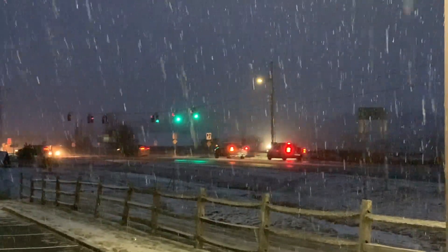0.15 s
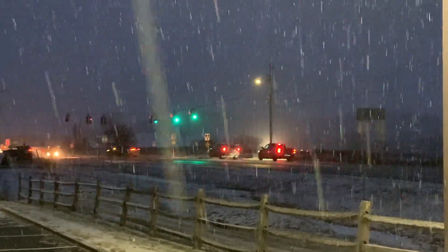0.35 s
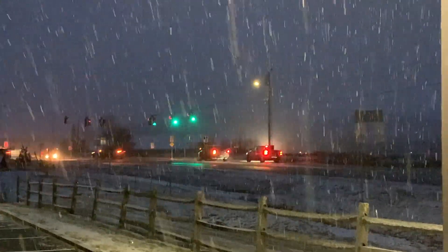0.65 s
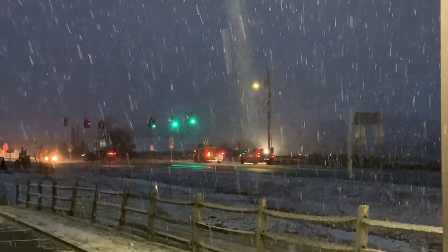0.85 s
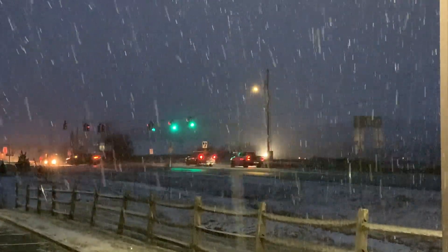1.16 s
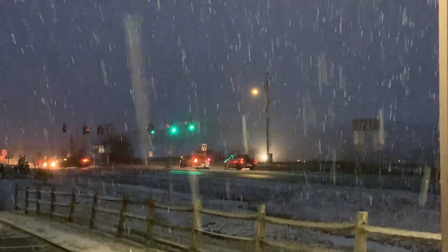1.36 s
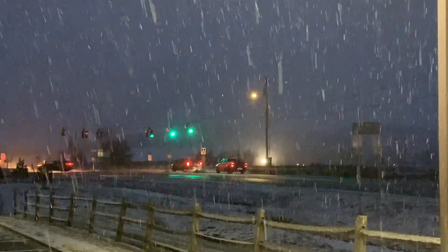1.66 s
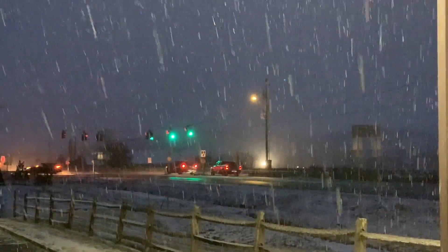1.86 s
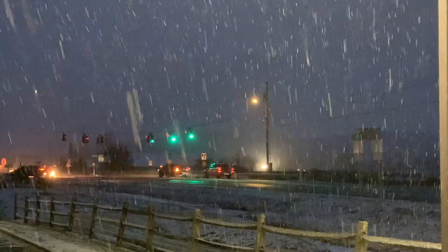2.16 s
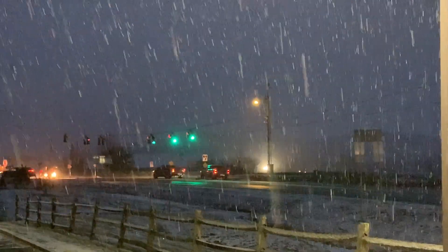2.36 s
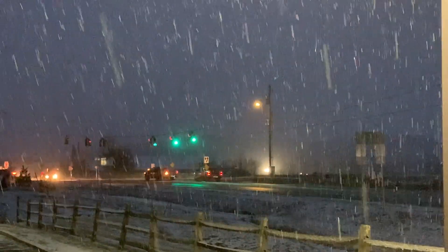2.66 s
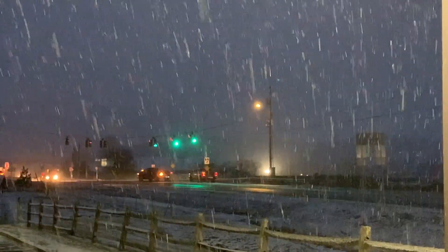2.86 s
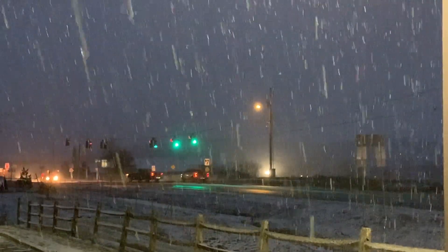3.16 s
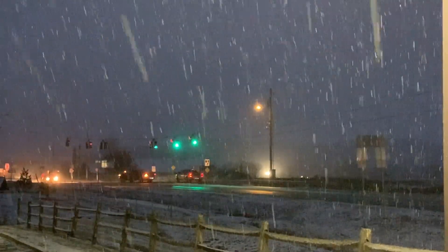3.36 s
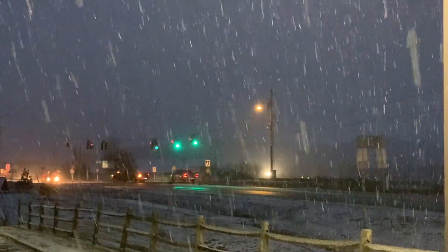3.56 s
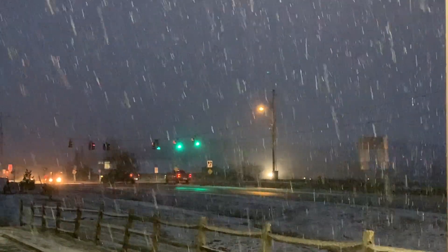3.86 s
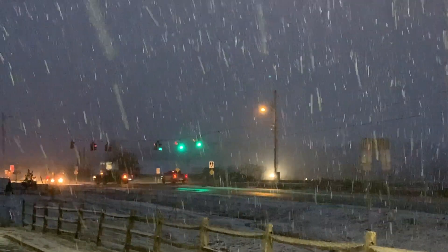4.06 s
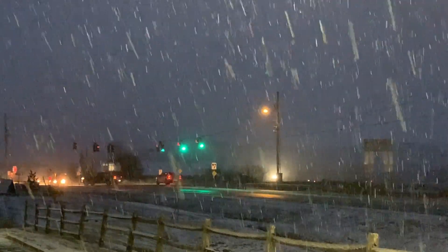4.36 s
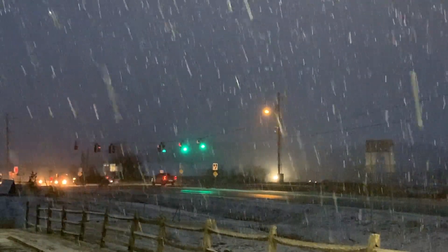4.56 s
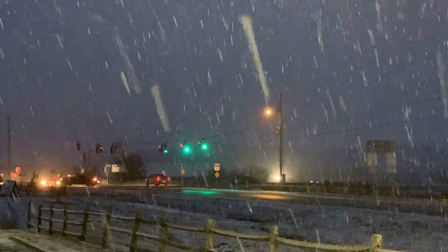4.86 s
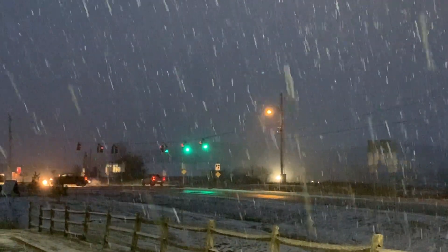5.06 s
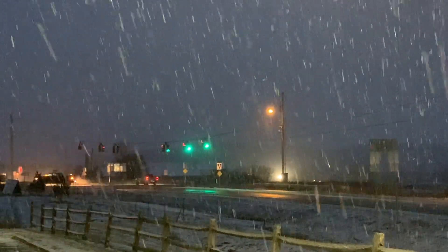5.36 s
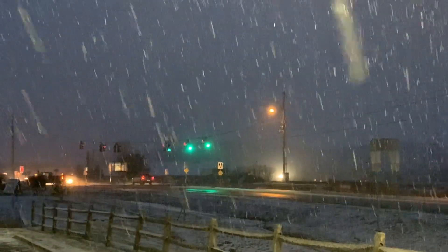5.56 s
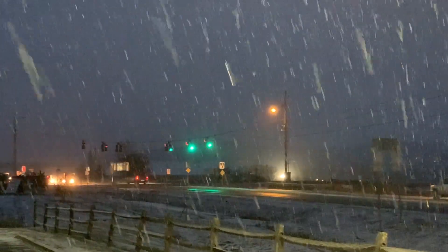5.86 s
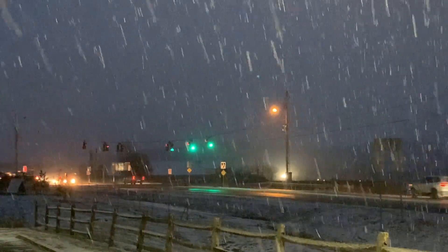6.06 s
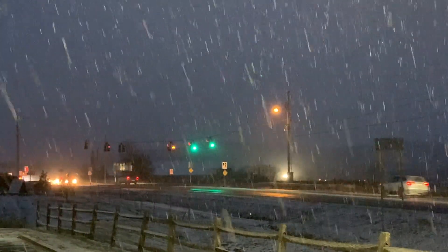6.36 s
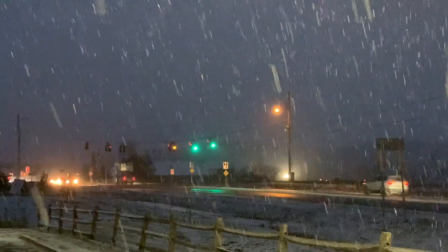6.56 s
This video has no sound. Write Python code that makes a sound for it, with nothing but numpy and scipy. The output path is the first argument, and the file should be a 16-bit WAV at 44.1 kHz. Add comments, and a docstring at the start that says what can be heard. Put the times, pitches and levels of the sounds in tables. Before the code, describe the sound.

Continuous traffic on wet, slushy pavement, slightly right of centre. Overlapping tyre roars swell and recede with soft bursts of bright slush hiss, hollow hum and fine sizzling mist. Underneath, a muffled engine pulls up through gears, brief low booms sag in pitch, a distant idle holds and a V8 throbs nearer. The stereo microphones stand back from the roadside in open air.

```python
"""Tyres roar and hiss on a wet, slushy road, heard from across a verge with a closely spaced microphone pair.
The cars are coloured noises with a moving ground reflection; slush, tread hum and fine mist are noise bands.
A V8 rumbles in from the right as sines on multiples of its cycle rate, over bands of gassy noise.
Behind it another engine pulls up through its gears as a sine with a faint octave, low booms well up,
a far engine idles on one low sine, and a wide wash of traffic noise lies underneath."""
import sys
import numpy as np
from scipy import signal
from scipy.fft import rfft, irfft, next_fast_len
from scipy.io import wavfile
from scipy.ndimage import uniform_filter1d, map_coordinates

SR = 44100
rng = np.random.default_rng(int(sys.argv[2]) if len(sys.argv) > 2 else 0)


def bounce(signal):
    """Save signal as a 16-bit WAV file at the path given by the first command-line argument."""
    frames = np.transpose(np.atleast_2d(signal))
    limited = np.clip(frames, -1, 1)
    pcm = np.round(limited * 32767).astype(np.int16)
    wavfile.write(sys.argv[1], SR, pcm)


N = 295911
TIME = np.arange(N) / SR


def from_db(db):
    """Decibels to gain."""
    return 10 ** (np.asarray(db) / 20)


def rms_one(x):
    """Scale to unit power."""
    return x / np.sqrt(np.mean(x ** 2) + 1e-20)


def in_time(rows):
    """Draw each column of a table as a curve over every sample."""
    seconds, *columns = np.transpose(rows)
    return [np.interp(TIME, seconds, column) for column in columns]


def drift(rate):
    """Slow chance with spread 1: noise through two equal low-pass poles at rate Hz."""
    step = 40  # samples between the slow values
    pole = np.exp(-2 * np.pi * rate * step / SR)
    chance = rng.standard_normal(N // step + 2002)
    slow = signal.lfilter([1], [1, -2 * pole, pole * pole], chance)[2000:]  # skip the filter's start
    return np.interp(np.arange(N) / step, np.arange(len(slow)), rms_one(slow))


def colour(x, points):
    """Equalise by a table of (Hz, dB), drawn over log frequency."""
    size = next_fast_len(N + SR // 4)
    hz, db = np.transpose(points)
    log_hz = np.log(np.maximum(np.arange(size // 2 + 1) * SR / size, 1))
    gain = from_db(np.interp(log_hz, np.log(hz), db))
    return irfft(rfft(x, size) * gain, size)[..., :N]


def noise(points, channels=1):
    """Unrelated noises of the given colour at unit power, dying away an octave beyond both ends."""
    closed = [(points[0][0] / 2, -100), *points, (points[-1][0] * 2, -100)]
    return rms_one(colour(rng.standard_normal((channels, N)), closed))


def tone(hz, level_db):
    """A sine on a moving pitch at a given rms level."""
    cycles = np.cumsum(hz) / SR + rng.random()
    return np.sqrt(2) * from_db(level_db) * np.sin(2 * np.pi * cycles)


def delayed(x, lag_ms):
    """The sound a moment later, by a delay that may move."""
    return map_coordinates(x, [np.arange(N) - lag_ms * SR / 1000], order=2, mode="nearest")


def from_right(x, lag_ms):
    """Sound from the right reaches the left microphone later."""
    return np.array([delayed(x, lag_ms), x])


def two_mics(direct, separate, lag_ms, scattered):
    """Mix sound from one direction with a share of power that is scattered to each microphone separately."""
    share = np.clip(scattered, 0, 1)
    return np.sqrt(1 - share) * from_right(direct, lag_ms) + np.sqrt(share) * separate


def spread(points, lag_ms, scattered):
    """Coloured noise from the right, partly scattered by the surroundings."""
    draws = noise(points, channels=3)
    return two_mics(draws[0], draws[1:], lag_ms, scattered)


SWELL_ATTACK_S, SWELL_RELEASE_S = 0.026, 0.057


def swell(start, length):
    """A level curve that rises to 1, holds and falls away."""
    rise = (TIME - start) / SWELL_ATTACK_S
    fall = 1 - (TIME - start - length) / SWELL_RELEASE_S
    return np.clip(np.minimum(rise, fall), 0, 1)


# Tyre tracks of two cars leaving, of traffic far up the road on the right, and of the arriving V8.
# Each row: time in seconds, tyre roar in dB, spray in dB (both before patchiness and pan),
# lag of the left microphone in ms, delay of the ground reflection in ms.
FIRST_CAR_TRACK = [(0, -46.5, -45, 0.38, 0.37), (.6, -42.5, -45, 0.42, 0.4), (1.3, -44, -49, 0.44, 0.497),
                   (1.8, -45.5, -45, 0.48, 0.601), (2.6, -56, -48.5, 0.441, 0.75),
                   (4, -76, -74, 0.53, 0.92)]
SECOND_CAR_TRACK = [(0, -60, -51.5, 0.4, 0.3), (1.1, -43.5, -48, 0.42, 0.32),
                    (2.3, -40.5, -43.5, 0.43, 0.384), (3.05, -37, -43, 0.416, 0.435),
                    (3.7, -42.5, -42.5, 0.47, 0.522), (4.4, -46, -45.5, 0.45, 0.654),
                    (5, -43.5, -51.5, 0.38, 0.78), (6.7, -41, -63, 0.49, 0.74)]
FAR_RIGHT_TRACK = [(0, -46.5, -65, 0.71, 0.35), (1.3, -49.5, -57, 0.45, 0.54),
                   (2.6, -43.5, -61, 0.51, 0.46), (3.2, -43, -53.5, 0.52, 0.47),
                   (4, -40.5, -41.5, .5, 0.495), (4.45, -47, -40.5, 0.54, 0.58),
                   (4.95, -44.5, -47, 0.51, 0.57), (5.4, -50, -54, 0.44, 0.66), (6.7, -54, -53, 0.43, 0.69)]
ARRIVING_TRACK = [(0, -47.5, -83, 0.18, 0.9), (3, -59.5, -45, 0.44, 1.02), (3.7, -50, -44.5, 0.34, 0.96),
                  (4.4, -42, -48.5, 0.44, 1.13), (4.95, -43, -43, 0.41, 0.87),
                  (5.25, -41, -42.5, 0.35, .78), (5.7, -36, -40, 0.31, 0.64),
                  (6.05, -37.5, -41, 0.25, 0.69), (6.35, -36, -39, 0.23, 0.58),
                  (6.7, -38, -42.5, 0.18, 0.47)]
# Tyre colours for the leaving cars, the far right and the V8.
# Each row: frequency in Hz, relative density in dB per Hz.
DISTANT_ROAR_COLOUR = [(100, 2), (300, -2), (500, -9), (720, -22), (1000, -1), (1400, 1.5), (1900, -16.5),
                       (2800, -12), (5000, -48)]
DISTANT_SPRAY_COLOUR = [(800, 4), (1700, 5), (2500, -2.5), (3400, -1), (4300, 1), (5200, -6), (6500, -13.5),
                        (7700, -16), (8200, -7), (9500, -19.5), (12000, -70)]
SIDE_ROAR_COLOUR = [(100, -26), (300, -13), (520, -2.5), (740, -0.5), (880, 1.5), (1200, -0.5), (1800, -3),
                    (2800, -35), (5000, -53)]
SIDE_SPRAY_COLOUR = [(800, 9), (1700, -6), (2600, -1), (3500, 3), (4200, 3), (5200, -28), (6500, -20),
                     (7700, -22), (8200, -13), (9500, -15), (13000, -72)]
CLOSE_ROAR_COLOUR = [(100, -21), (300, -8), (390, -6), (490, -7), (620, -2), (740, 1.5), (950, -3.5),
                     (1150, -7.5), (1400, -4.5), (1800, -9), (2800, -20.5), (5000, -36)]
CLOSE_SPRAY_COLOUR = [(800, -0.5), (1700, -4), (2600, 1.5), (3500, -0.5), (4400, -3), (5400, -17),
                      (6800, -26), (8200, -43), (9500, -17), (13000, -62)]
ROAD_REFLECTS = .4  # ground reflection off the wet road, as a share of the direct amplitude


def tyres(track, roar_colour, spray_colour, scattered, reflected, patchy_db, pan_db):
    """The tread roars and flings slush; an inverted ground reflection sweeps notches through both."""
    roar_db, spray_db, lag_ms, reflection_ms = in_time(track)
    roar = from_db(roar_db + patchy_db * drift(18.0)) * noise(roar_colour, channels=3)
    spray = from_db(spray_db + patchy_db * drift(21.0)) * noise(spray_colour, channels=3)
    draws = roar + spray
    direct = draws[0] - reflected * delayed(draws[0], reflection_ms)
    direct = direct / np.hypot(1, reflected)  # keep the power despite the reflection
    both = two_mics(direct, draws[1:], lag_ms, scattered)
    return both * from_db([[pan_db / 2], [-pan_db / 2]])


def road_traffic():
    """Four streams of tyre noise: two cars leaving, far traffic on the right and the arriving V8."""
    road = tyres(FIRST_CAR_TRACK, DISTANT_ROAR_COLOUR, DISTANT_SPRAY_COLOUR, scattered=0.11,
                 reflected=ROAD_REFLECTS, patchy_db=0.5, pan_db=-0.2)
    road += tyres(SECOND_CAR_TRACK, DISTANT_ROAR_COLOUR, DISTANT_SPRAY_COLOUR, scattered=0.059,
                  reflected=ROAD_REFLECTS, patchy_db=1.06, pan_db=-1.0)
    road += tyres(FAR_RIGHT_TRACK, SIDE_ROAR_COLOUR, SIDE_SPRAY_COLOUR, scattered=0.093,
                  reflected=ROAD_REFLECTS, patchy_db=0.36, pan_db=1.5)
    road += tyres(ARRIVING_TRACK, CLOSE_ROAR_COLOUR, CLOSE_SPRAY_COLOUR, scattered=0.098,
                  reflected=0.032, patchy_db=1.0, pan_db=-1.5)
    return road


# Patches of deeper slush under the tyres. Each row: peak time in seconds, time in seconds from the peak
# to 1/e of its amplitude, peak level in dB before flutter, lag of the left microphone in ms.
SLUSH_SWELLS = [(1.048, 0.19, -58, 0.46), (2.1, .22, -58, .45), (3.3, 0.19, -55, .4),
                (3.723, 0.43, -53, .3), (5.405, 0.74, -55, 0.3)]
# Bright slush hiss. Each row: frequency in Hz, relative density in dB per Hz.
SLUSH_HISS_COLOUR = [(3800, -20), (4900, 5), (5500, 1), (6600, -2), (7400, -5), (8300, -3), (10000, -13)]


def slush(flutter_db):
    """Each patch of deeper slush throws up a swell of bright hiss."""
    hiss = 0
    for peak, half_length, db, lag_ms in SLUSH_SWELLS:
        bell = np.exp(-((TIME - peak) / half_length) ** 2)
        hiss += from_db(db) * bell * spread(SLUSH_HISS_COLOUR, lag_ms, scattered=0.3)
    return hiss * from_db(flutter_db * drift(20))


# Tread hum. Each row: time in seconds, level in dB before flutter, lag of the left microphone in ms.
TREAD_HUM_TRACK = [(0, -66, 0.44), (2.6, -54.5, .45), (2.95, -48, 0.71), (3.3, -52, 0.48),
                   (3.95, -45.5, 0.44), (4.5, -52, 0.47), (5.4, -50, .36), (5.85, -44.5, 0.24),
                   (6.7, -48.5, .2)]
# Narrow band of the hum. Each row: frequency in Hz, relative density in dB per Hz.
TREAD_HUM_COLOUR = [(580, -23), (720, 1.5), (800, 6), (930, -8), (1150, -23)]


def tread(flutter_db):
    """Air pumped from the tread grooves gives an unsteady, hollow hum."""
    level_db, lag_ms = in_time(TREAD_HUM_TRACK)
    hum = spread(TREAD_HUM_COLOUR, lag_ms, scattered=0.042)
    return from_db(level_db + flutter_db * drift(21)) * hum


# Fine droplets that only carry from nearby. Each row: time in seconds, level in dB before gain and flutter.
MIST_LEVEL = [(0.15, -80), (1.48, -75), (2.18, -65), (2.48, -68), (2.99, -62), (3.9, -63.5), (4.45, -64),
              (5.26, -57), (6.15, -61), (6.68, -66.5)]
# Colours of the sizzle and of its very top. Each row: frequency in Hz, relative density in dB per Hz.
MIST_SIZZLE_COLOUR = [(4000, -3), (7000, 2.5), (8300, 3), (9500, 1.5), (11000, 0), (12000, -31)]
MIST_TOP_COLOUR = [(11800, -47), (12600, 8.5), (13400, 0), (14200, -5), (15000, -21)]


def mist(gain_db, flutter_db, top_db, top_follows):
    """The finest spray sizzles at the top of the range; the very top fades fastest with distance."""
    level_db, = in_time(MIST_LEVEL)
    flutter = from_db(flutter_db * drift(25))
    sizzle = from_db(level_db + gain_db) * spread(MIST_SIZZLE_COLOUR, lag_ms=0.4825, scattered=0.15)
    top_level_db = top_db + top_follows * (level_db - level_db.max())
    top = from_db(top_level_db) * spread(MIST_TOP_COLOUR, lag_ms=0.435, scattered=0.1)
    return flutter * (sizzle + top)


# V8 engine speed. Each row: time in seconds, four-stroke cycles per second in Hz before a slight waver.
V8_CYCLE_RATE = [(0, 10.44), (.65, 10.18), (1.7, 10.41), (2.4, 10.65), (3.5, 10.76), (4.1, 10.96),
                 (4.6, 10.85), (5.1, 10.89), (6.7, 10.66)]
# How strong the low exhaust drone is, and how near the engine. Each row: time in seconds, level in dB
# (only its distance from the full level below counts).
V8_DRONE_LEVEL = [(0, -42.5), (.35, -35.5), (.8, -31.5), (1.05, -42), (1.35, -30.5), (1.58, -31.5),
                  (1.7, -33.5), (1.84, -26), (2.05, -36), (2.26, -25), (2.52, -29.5), (2.75, -26),
                  (3.5, -22.5), (4.05, -26.5), (4.3, -25.5), (5.45, -26.5), (6.15, -39), (6.38, -27.5),
                  (6.7, -49)]
V8_NEARNESS = [(0, -66), (1.1, -58), (1.6, -45), (2.5, -44), (4, -36), (5.4, -33), (6.2, -37.5), (6.7, -47)]
FULL_DRONE_DB, FULL_NEAR_DB = -23.5, -34  # here the orders have their listed strength
# Exhaust orders. Each row: multiple of the cycle rate, level in dB at full drone and nearness.
V8_EXHAUST_ORDERS = [(4, -41.5), (5, -29), (7, -39), (8, -29.5), (9, -45), (10, -40.5), (11, -34),
                     (12, -50.5), (13, -24), (14, -41.5), (15, -47), (16, -30), (17, -40), (18, -37.5),
                     (20, -36.5), (21, -37), (22, -42), (24, -50), (25, -47), (26, -47), (28, -50.5),
                     (29, -44), (30, -50), (31, -52.5), (33, -51), (37, -52)]
# How the orders follow the engine, read between rows. Each row: multiple of the cycle rate,
# dB per dB of drone, dB per dB of nearness.
V8_ORDERS_FOLLOW = [(5, 0.8, 0.34), (7.88, 0.38, 0.1), (9, -0.5, 0.1), (10, 0, 0), (11.4, 0.2, 0.16),
                    (13.03, 1.0, -0.05), (16.7, 0.1, 0.59), (18.8, -0.4, 3.9), (19.4, -0.3, 2.24),
                    (24.3, 0.5, 0.3), (28, -1, 1.7), (30.6, 0.5, 0.5)]
# Single exhaust notes swell or sink. Each row: start in seconds, length in seconds,
# multiple of the cycle rate, gain in dB.
V8_ORDER_SWELLS = [(1.6, 1.67, 5, -5.5), (4.7, 0.72, 5, 2.5), (5.75, 1.2, 5, 6.5), (0.626, 0.26, 8, -17),
                   (2.5, .24, 8, 4.5), (2.164, 0.26, 8, 5.5), (4.5, 0.86, 8, -3), (5.106, 0.36, 8, 5),
                   (5.6, 0.38, 8, 7.5), (4.9, 0.24, 8, 2), (1.3, 0.56, 10, 6), (5.35, 0.752, 10, 8.5),
                   (1.54, 1.513, 11, 3.5), (4.8, 0.71, 16, 4), (1.42, .65, 21, 7), (4.95, 0.46, 21, 4),
                   (5.8, 0.64, 21, 6), (1.65, 0.72, 25, 8.5)]
# The gassy rumble surges or dips. Each row: start in seconds, length in seconds, gain in dB.
V8_RUMBLE_SURGES = [(1.285, 0.72, 4.5), (2.17, 0.23, -1.5), (2.69, 1, 3.5), (6.25, 0.19, 4.5)]
# Gassy rumble and mechanical rush. Each row: frequency in Hz, relative density in dB per Hz.
V8_RUMBLE_COLOUR = [(25, -20), (36, -22), (46, -14), (57, 1.5), (68, 0), (85, -4.5), (110, -2), (145, 2),
                    (180, -6.5), (260, -11.5), (400, -45)]
V8_RUSH_COLOUR = [(100, -25), (200, -3.5), (265, -5.5), (310, -4.5), (375, 0), (470, -8.5), (650, -20),
                  (1200, -30)]


def v8(waver_db, rumble_db, rumble_follows, rush_db):
    """Uneven firing in each bank puts exhaust lines on multiples of the cycle rate, over a gassy rumble."""
    cycle_hz, = in_time(V8_CYCLE_RATE)
    cycle_hz = cycle_hz * (1 + .003 * drift(5))
    drone_db = in_time(V8_DRONE_LEVEL)[0] - FULL_DRONE_DB
    near_db = in_time(V8_NEARNESS)[0] - FULL_NEAR_DB
    lag_ms = in_time(ARRIVING_TRACK)[-1]  # the reflection delay of its tyres doubles as the engine's lag
    multiples, by_drone, by_nearness = np.transpose(V8_ORDERS_FOLLOW)
    strongest_db = max(db for _, db in V8_EXHAUST_ORDERS)
    exhaust = 0
    for order, db in V8_EXHAUST_ORDERS:
        order = round(order)
        level_db = db + np.interp(order, multiples, by_drone) * drone_db
        level_db += np.interp(order, multiples, by_nearness) * near_db
        for start, length, multiple, gain_db in V8_ORDER_SWELLS:
            if round(multiple) == order:
                level_db += gain_db * swell(start, length)
        weakness = np.clip((strongest_db - db) / 15, .2, 1)  # weak orders waver most
        exhaust += tone(order * cycle_hz, level_db + weakness * waver_db * drift(3.2))
    surge_db = sum(db * swell(start, length) for start, length, db in V8_RUMBLE_SURGES)
    rumble_level_db = rumble_db + rumble_follows * drone_db + surge_db
    rumble = from_db(rumble_level_db) * spread(V8_RUMBLE_COLOUR, lag_ms, scattered=0.12)
    rush = from_db(rush_db + near_db) * spread(V8_RUSH_COLOUR, lag_ms, scattered=0.54)
    return from_right(exhaust, lag_ms) + rumble + rush


def drone(hz, level_db, overtone_db):
    """A muffled, slightly rough firing note with a faint octave."""
    level_db = level_db + drift(14.0)
    return tone(hz, level_db) + tone(2 * hz, level_db + overtone_db)


# Second engine, climbing and dropping in pitch as it changes gear.
# Each row: time in seconds, firing rate in Hz, level in dB before roughness.
CLIMBING_ENGINE = [(0, 107.3, -29), (.3, 110.8, -29.5), (.7, 113, -40.5), (1.05, 73.72, -41.5),
                   (1.4, 76.3, -36), (1.7, 82, -47), (2.9, 90.25, -33), (3.8, 98.5, -24),
                   (4.25, 102.3, -32), (4.65, 104.8, -27), (4.85, 97.35, -31.5), (5.15, 84.8, -26.5),
                   (5.9, 84, -29), (6.1, 75.5, -30), (6.25, 79.1, -46), (6.5, 81.8, -35), (6.7, 86.06, -32)]


def climbing_engine():
    """An engine pulls up through its gears, its firing note gliding along the table."""
    firing_hz, level_db = in_time(CLIMBING_ENGINE)
    return drone(firing_hz, level_db, overtone_db=-28.0)


# Low booms. Each row: start in seconds, length in seconds, starting pitch in Hz, level in dB before roughness.
LOW_BOOMS = [(0, 0.17, 54, -37), (1.365, 0.086, 60.56, -32), (2.663, 0.52, 63.5, -26)]
BOOM_SAG_HZ_PER_S = 4.8


def booms(overtone_db):
    """A low note wells up briefly and sags in pitch."""
    total = 0
    for start, length, hz, db in LOW_BOOMS:
        sagging_hz = hz - BOOM_SAG_HZ_PER_S * np.clip(TIME - start, 0, 1)
        total += swell(start, length) * drone(sagging_hz, db, overtone_db)
    return total


IDLE_HZ, IDLE_DB = 44.55, -41.5


def idle():
    """An engine idling far off leaves one steady low note with a slowly drifting level."""
    return tone(np.full(N, IDLE_HZ), IDLE_DB + 2 * drift(1.4))


# Wash of traffic from all around. Each row: frequency in Hz, relative density in dB per Hz.
WASH_COLOUR = [(45, 19.5), (130, 2.5), (250, 12), (450, -12), (780, 8), (1000, 5), (1350, 6.5),
               (2000, -9.5), (3000, -4.5), (4200, -12), (6000, -5.5), (8500, -42)]


def wash():
    """Farther roads blend into a steady noise, mostly scattered and so nearly unrelated at the two microphones."""
    return from_db(-46.5) * spread(WASH_COLOUR, lag_ms=0.3, scattered=0.82)


def flicker(x, depth_db):
    """The noise comes and goes in patches a few hundred Hz wide and under a tenth of a second long."""
    cells = signal.stft(x, nperseg=1024)[-1]
    chance = rng.standard_normal(cells.shape[1:])  # the same for both microphones
    across_hz = uniform_filter1d(chance, size=6, axis=0)
    patches = rms_one(uniform_filter1d(across_hz, size=6, axis=1))
    return signal.istft(cells * from_db(depth_db * patches))[1][:, :N]


def scene():
    """Flickering tyre noise, slush, tread hum, mist and wash, with the engines added on top."""
    hiss = road_traffic() + slush(flutter_db=-0.7) + tread(flutter_db=2.0)
    hiss += mist(gain_db=7.0, flutter_db=1.1, top_db=-57.5, top_follows=1.17) + wash()
    engines = v8(waver_db=3.0, rumble_db=-31.5, rumble_follows=0.34, rush_db=-39.0)
    other_engines = climbing_engine() + booms(overtone_db=-11.5) + idle()
    engines += from_right(other_engines, lag_ms=0.23)
    return flicker(hiss, depth_db=1.46) + engines


# The stereo difference is raised around 500-750 Hz and slightly near 2 kHz, lowered elsewhere.
# Each row: frequency in Hz, gain of the difference signal in dB.
PAIR_SIDE_GAIN = [(60, -2.5), (150, -4), (320, -6), (520, 7), (750, 4.5), (1100, -1), (1450, -5),
                  (2000, 1.5), (15000, -2.5)]
# The microphones differ in colour. Each row: frequency in Hz, left minus right in dB.
PAIR_BALANCE = [(60, -0.2), (150, 0.5), (400, 4), (750, -2), (1300, -0.5), (1900, -0.5), (3500, -0.5),
                (7600, -0.5), (8200, -12.5), (9000, -1.5), (10000, 0)]
CUTOFF_HZ = 14500


def record(dry):
    """The stereo difference is equalised, each microphone has its own colour, and the top is cut steeply."""
    mid = (dry[0] + dry[1]) / 2
    side = colour((dry[0] - dry[1]) / 2, PAIR_SIDE_GAIN)
    left = colour(mid + side, [(hz, db / 2) for hz, db in PAIR_BALANCE])
    right = colour(mid - side, [(hz, -db / 2) for hz, db in PAIR_BALANCE])
    low_pass = signal.ellip(10, .1, 80, CUTOFF_HZ, fs=SR, output="sos")  # 0.1 dB ripple, 80 dB down
    return signal.sosfilt(low_pass, [left, right])


dry = scene()
out = record(dry)
bounce(out)
```